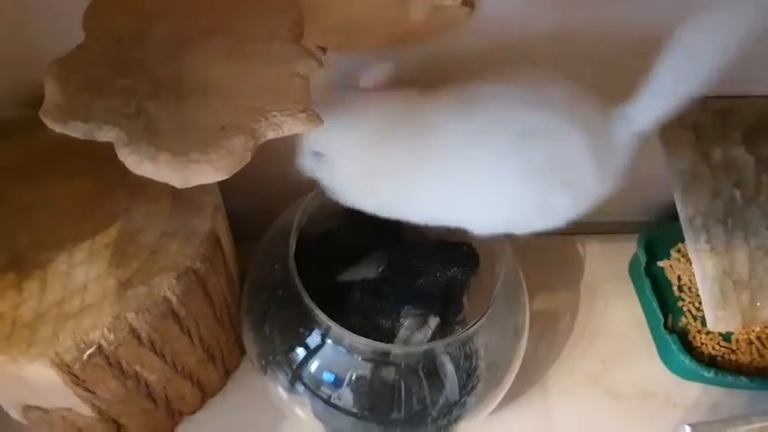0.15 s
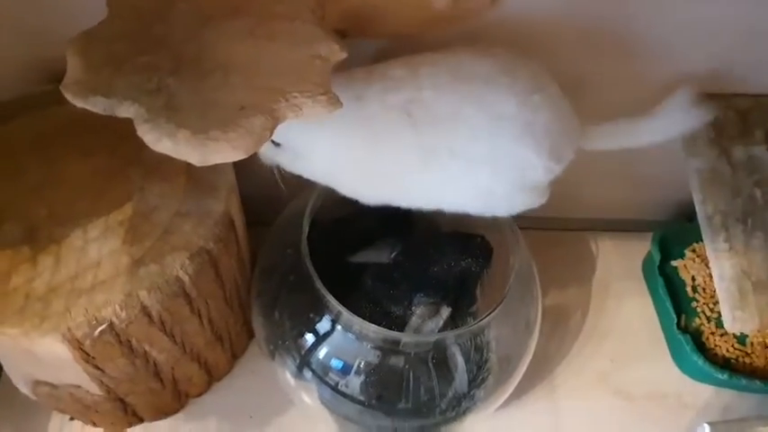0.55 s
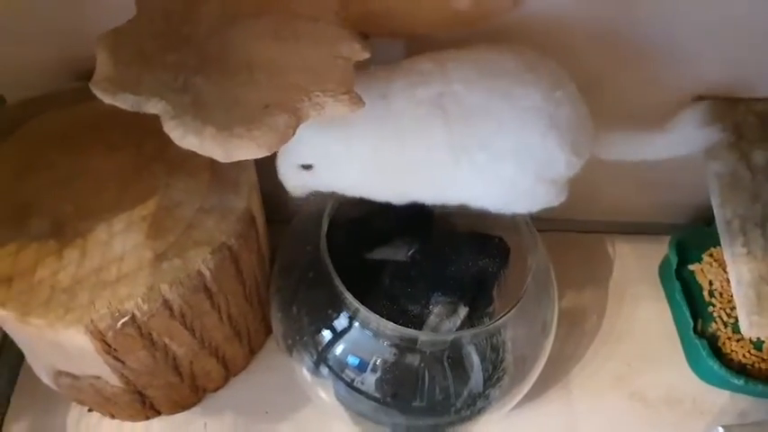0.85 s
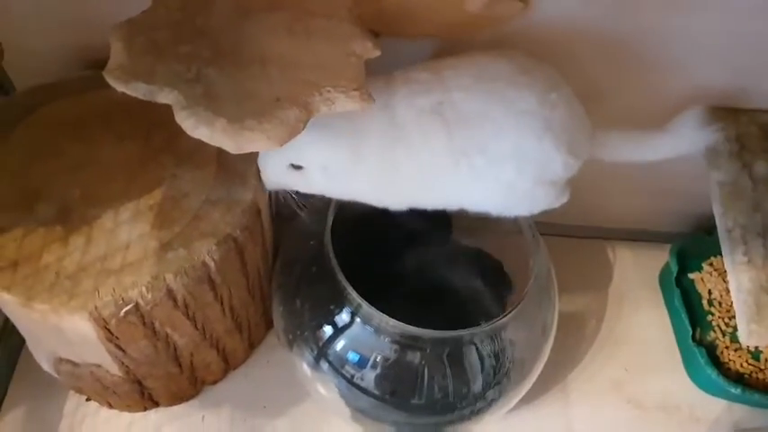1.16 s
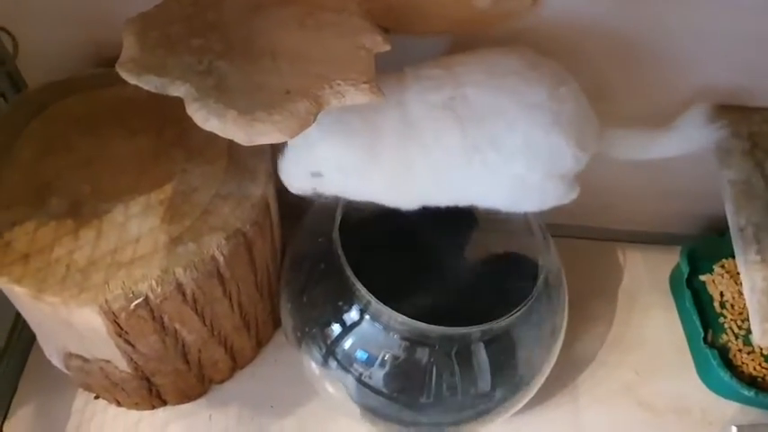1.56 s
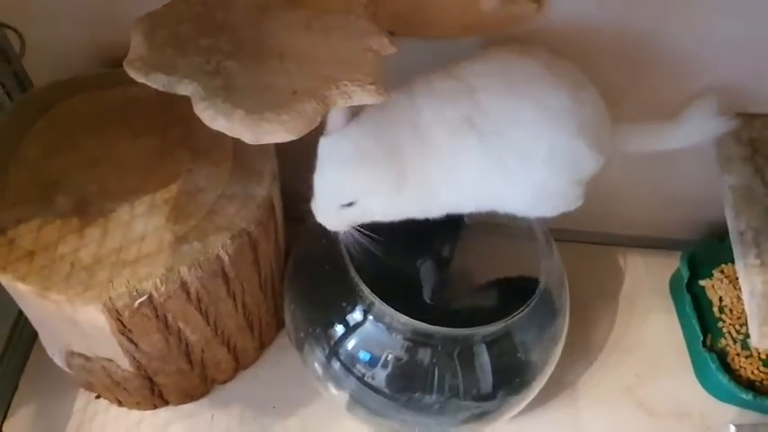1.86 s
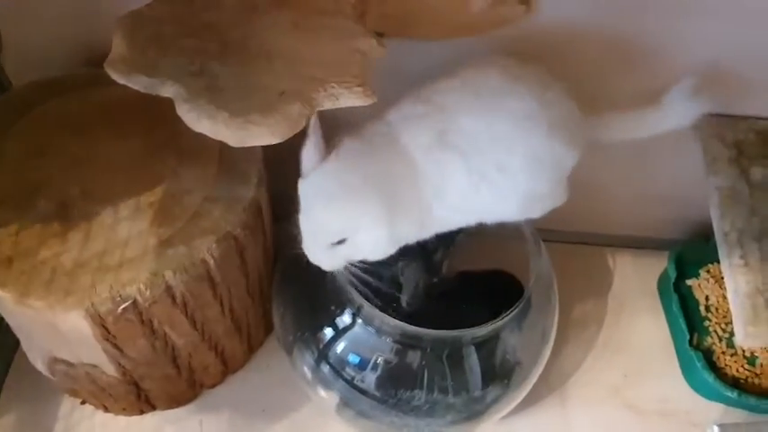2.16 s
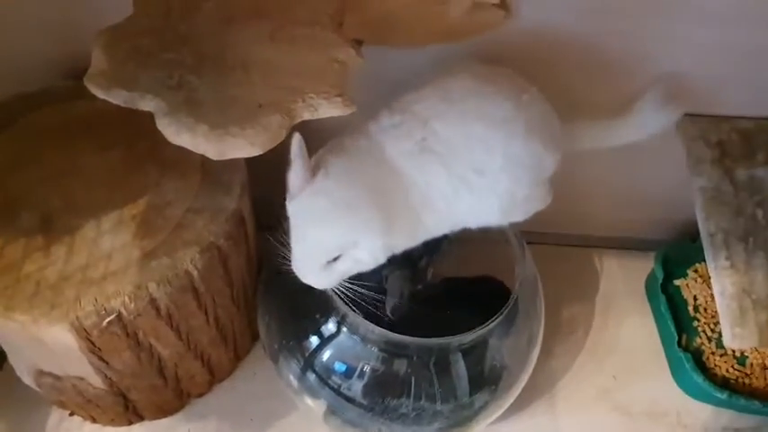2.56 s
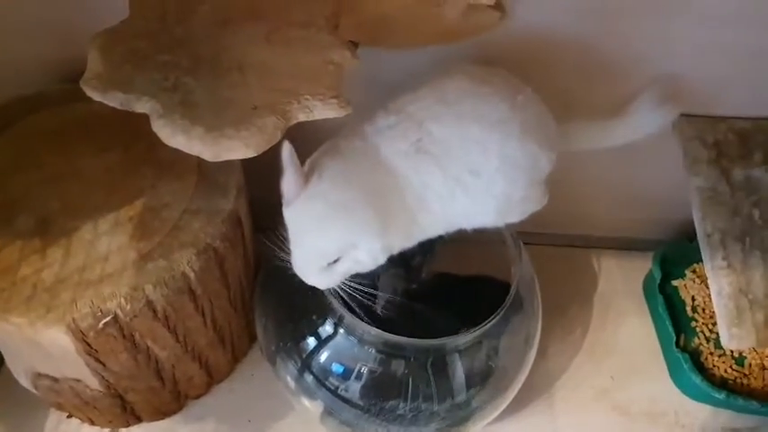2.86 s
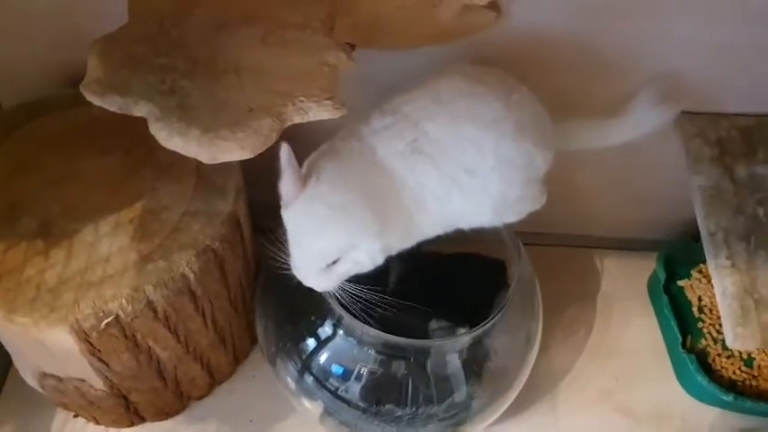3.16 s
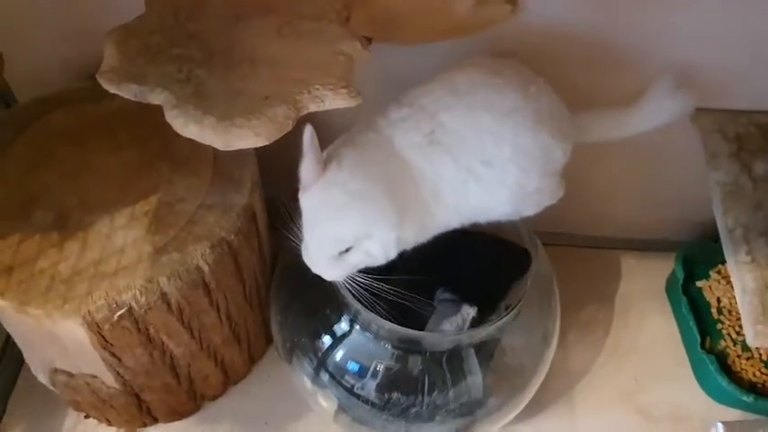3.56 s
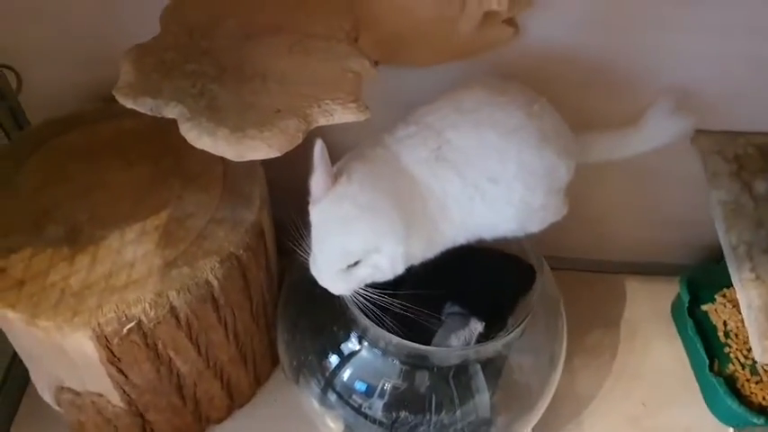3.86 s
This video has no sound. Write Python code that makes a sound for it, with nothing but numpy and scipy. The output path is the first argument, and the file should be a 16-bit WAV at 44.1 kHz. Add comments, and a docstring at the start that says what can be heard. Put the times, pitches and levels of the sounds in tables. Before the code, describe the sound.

Chinchillas rustle and swish dust in a glass bowl after a hollow landing knock and rattle

```python
"""Two chinchillas at a glass bowl of dust on a wooden shelf, in a quiet room, close to a two-port microphone.
At once one hops on: a hollow knock, a loose metal part rattles, the shelf shakes, a little dust flies.
Fur then sweeps past and a faint tone sounds. From 1.1 s the other rolls in the bowl, throwing dust against
the glass in quick bursts, with softer knocks. Weak throws follow; near the end, a scuff of fur and a faint
tone. Dust, fur and room are shaped noise; shelf, glass and hollow modes ring."""
import sys
import numpy as np
from scipy import signal
from scipy.fft import rfft, irfft
from scipy.io import wavfile
from scipy.ndimage import uniform_filter1d

SR = 44100
rng = np.random.default_rng(int(sys.argv[2]) if len(sys.argv) > 2 else 0)


def rack_gain(trim_db):
    """Turn a fader trim in dB into the linear factor to multiply a signal by."""
    fader = np.asarray(trim_db, float)
    return 10 ** (fader / 20)


def master(y):
    """Save y as 16-bit WAV."""
    cut = np.clip(np.atleast_2d(y).T, -1, 1)
    pcm = np.round(cut * 32767)  # scale
    wavfile.write(sys.argv[1], SR, pcm.astype(np.int16))


N = 176400  # samples: 4 s

# blows of the landing and of the rolling: t/s, level/dB, pitch factor
BLOWS = [(.050, -24, 1), (.0545, -18, 1.013), (0.0602, -16.5, 1.003), (.074, -24.5, 1.05),
         (1.435, -44.5, 0.99), (1.478, -40, 0.93), (1.497, -32.5, 0.85)]
# spectrum of brushing fur, also used for metal contact hiss: f/Hz, level/dB per Hz
FUR_SPECTRUM = [(1060, -14), (1800, -22), (2730, -12), (3300, -5), (3820, -8), (5640, -1.5), (6820, -4),
                (9890, -7.5), (11400, -4), (15700, -14)]


def evened(x):
    """Brings a signal to unit rms."""
    return x / np.sqrt(np.mean(x ** 2) + 1e-20)


def read(points, hz):
    """Reads a table of (f/Hz, value) along log frequency."""
    f, value = np.transpose(points)
    return np.interp(np.log(hz + 1), np.log(f + 1), value)


def add(mix, s, sound):
    """Lays a sound into the mix at s seconds, cut off at the end."""
    part = mix[..., round(s * SR):][..., :sound.shape[-1]]
    part += sound[..., :part.shape[-1]]


def colour(x, points):
    """Filters by a spectrum table."""
    hz = np.fft.rfftfreq(x.shape[-1], 1 / SR)
    return irfft(rfft(x) * rack_gain(read(points, hz)), x.shape[-1])


def resonate(x, hz, width):
    """Passes a signal through one resonance: shifted down to 0 Hz, smoothed, shifted back."""
    turn = np.exp(2j * np.pi * hz * np.arange(x.shape[-1]) / SR)
    r = np.exp(-np.pi * width / SR)
    return 2 * (turn * signal.lfilter([1 - r], [1, -r], x / turn)).real


def pair(same, pan_db):
    """Two noise channels of a given likeness (0-1) and balance."""
    a, b = rng.standard_normal((2, N))
    other = same * a + np.sqrt(1 - same ** 2) * b
    return np.array([a, other]) * rack_gain(np.array([[pan_db], [-pan_db]]) / 2)


def ring(modes, factor, extra_db, rise_s):
    """Sum of decaying sine modes (f/Hz, level/dB, t60/s) after a short linear rise."""
    t = np.arange(SR // 3) / SR
    hz, db, t60 = np.transpose(modes)[:, :, None]
    envelope = rack_gain(db + extra_db[:, None] - 60 * t / t60)
    tones = envelope * np.sin(2 * np.pi * hz * factor * t)
    return tones.sum(0) * np.minimum(t / rise_s, 1)


def room_tone():
    """Steady air noise, most alike at both ports in the bass, with faint wavering hum lines."""
    # air of the room: f/Hz, level/dB per Hz
    air_spectrum = [(15, -45), (25, -41), (43, 0.5), (91, 2.5), (148, -15.5), (200, -28), (300, -13),
                    (424, -27.5), (485, -19), (767, -30), (951, -33.5), (1390, -41), (2500, -46),
                    (4800, -47.5), (5600, -40), (6600, -39), (7600, -49), (11000, -53.5), (15700, -57.5)]
    # hum lines: f/Hz, level/dB
    hum_lines = [(199, -67), (301, -70), (398, -74)]
    # left-right likeness of the air: f/Hz, likeness 0-1
    likeness = [(40, 1), (250, 0.76), (600, 0.2), (1500, 0.022), (5000, 0.018), (12000, 0.047)]
    air_db, hum_width_hz = -52, 8
    a, b = rfft(rng.standard_normal((2, N)))
    hz = np.fft.rfftfreq(N, 1 / SR)
    same = np.clip(read(likeness, hz), 0, 1)
    both = np.array([a, same * a + np.sqrt(1 - same ** 2) * b])
    air = irfft(both * rack_gain(read(air_spectrum, hz)), N)
    hum = sum(rack_gain(db) * evened(resonate(rng.standard_normal(N), f, hum_width_hz)) for f, db in hum_lines)
    return rack_gain(air_db) * evened(air) + hum


def shelf():
    """Random pushes ring the shelf's lowest mode and thud through the boards."""
    # shaking: t/s, lowest mode level/dB, thud level/dB
    shaking = [(0, -34.5, -52.5), (.05, -39, -52), (.09, -50, -34.5), (.14, -31.5, -40), (.18, -40, -34),
               (0.219, -28.5, -41.5), (.29, -43, -54), (.43, -42, -54.5), (.5, -49, -63), (.58, -44, -58.5),
               (.96, -46.5, -64.5), (1.072, -44.5, -65), (1.24, -41, -48.5), (1.29, -47, -54),
               (1.39, -43, -51), (1.43, -33, -38.5), (1.46, -35, -42.5), (1.497, -50, -30),
               (1.53, -31, -37.5), (1.59, -38.5, -49.5), (1.78, -39.5, -51.5), (1.84, -42, -42),
               (1.93, -52, -54), (2.022, -44.5, -46), (2.162, -88, -64.5)]
    # thudding of the boards: f/Hz, level/dB per Hz
    thud_spectrum = [(18, -41), (30, -12.5), (54, -9.5), (100, -1), (171, -8.5), (240, -9), (400, -23.5),
                     (464, -16), (751, -28.5), (1170, -42.5), (2500, -48.5), (5500, -120)]
    mode_hz, mode_width_hz, push_width_hz = 55.67, 7.8, 28
    s, low_db, thud_db = np.transpose(shaking + [(2.6, -90, -90)])  # dies away at last
    t = np.arange(N) / SR
    low = resonate(pair(1.0, 0), mode_hz, mode_width_hz)
    low = resonate(low, mode_hz, push_width_hz)
    thud = colour(pair(0.89, 0.55), thud_spectrum)
    low_gain, thud_gain = rack_gain(np.interp(t, s, low_db)), rack_gain(np.interp(t, s, thud_db))
    return evened(low) * low_gain + evened(thud) * thud_gain


def dust():
    """Each throw is a patchy spray of fine grains that swells, trickles away and rings the glass."""
    # throws: t/s, level/dB before a common trim, treble tilt/dB per octave, t60/s
    throws = [(0.038, -40.5, -2, 0.15), (0.118, -36.5, -6, 0.49), (0.163, -79, 13, 1),
              (1.097, -49, -9, 0.31), (1.138, -47.5, 4, 0.11), (1.184, -41, -7, 0.68),
              (1.222, -51.5, 13.5, 0.58), (1.33, -39.5, -5.5, 0.53), (1.375, -33, -3.5, 0.25),
              (1.449, -33.5, -2.5, 0.24), (1.516, -24.5, -1, .19), (1.572, -33, 4, 0.14),
              (1.617, -34, -1, .24), (1.674, -39.5, 8, 0.71), (1.73, -36.5, -13, 0.54),
              (1.786, -38.5, 9, 0.31), (1.828, -30.5, 5.5, 0.15), (1.865, -33, -4, 0.1),
              (1.93, -54, -18, 0.44), (2.005, -49.5, -1.5, 0.36), (2.27, -59, -8, 0.13),
              (2.311, -53, -32, .25), (2.606, -60.5, -5, 0.13), (2.808, -49.5, -10, 0.19),
              (2.843, -52.5, 1, 0.21), (3.379, -54.5, -1.5, 1)]
    # sprayed dust: f/Hz, level/dB per Hz
    dust_spectrum = [(880, -11.5), (1500, -31.5), (2400, -25), (2900, -25.5), (3550, -18), (4000, -17),
                     (5000, -11.5), (6480, 0.5), (9610, -7), (11900, -4.5), (15700, -15)]
    # glass rings of the bowl: f/Hz, width/Hz, level/dB before a common gain
    glass = [(2780, 90, 6), (2920, 70, 8), (3167, 90, 6), (3830, 50, 1), (4090, 110, 5), (4720, 45, 8)]
    grains_per_s, grain_spread_db, patchy_db = 6000, 2.3, 2.3
    rise_s, trim_db, glass_gain = .026, -13.5, 3
    thin_db_per_db = 0.63  # throws weaker than -40 dB in the table lose their lower part
    size = rack_gain(grain_spread_db * rng.exponential(1, N))
    grains = size * (rng.random(N) < grains_per_s / SR)
    spray = pair(0.057, 0) * (.5 + evened(grains))
    spray = spray + sum(rack_gain(db) * glass_gain * resonate(spray, hz, w) for hz, w, db in glass)
    # patches: slow random level changes over time and frequency
    z = signal.stft(spray, nperseg=256)[2]
    patches = uniform_filter1d(rng.standard_normal(z.shape[1:]), size=7, axis=0)
    patches = uniform_filter1d(patches, size=9, axis=1)
    patchy = signal.istft(z * rack_gain(patchy_db * evened(patches)), nperseg=256)[1][:, :N]
    spray = evened(colour(patchy, dust_spectrum))
    out, t = np.zeros((2, N)), np.arange(SR // 2) / SR
    for s, db, tilt_db, t60 in throws:
        part = spray[:, round(s * SR):][:, :len(t)]
        thin_db = thin_db_per_db * min(db + 40, 0)
        part = colour(part, [(4000, thin_db), (5500, 0), (7000, 0), (28000, 2 * tilt_db)])
        u = t[:part.shape[1]] / rise_s
        fall_db = -60 * np.maximum(u - 1, 0) * rise_s / t60
        swell = np.sin(np.pi / 2 * np.minimum(u, 1))
        add(out, s - 0.5 * rise_s, part * rack_gain(db + trim_db + fall_db) * swell)
    return out


def rattles():
    """Each touch and its rebounds ring damped, slightly shifted metal modes, with a hiss of contact."""
    # touches: t/s, level/dB before a common trim
    touches = [(0.032, -44.5), (0.044, -37), (0.12, -29.5), (.128, -38), (0.144, -29.5), (0.167, -35),
               (.175, -31), (0.193, -48), (.208, -49.5), (.254, -46.5), (0.322, -43), (.363, -40),
               (0.376, -47.5), (0.823, -45.5), (0.858, -50), (0.968, -58.5), (0.991, -45.5), (1.011, -56),
               (1.739, -55), (1.859, -47), (1.909, -49.5), (1.935, -46.5), (2.019, -47), (2.089, -46.5),
               (2.155, -59)]
    # modes of the loose metal part: f/Hz, level/dB
    metal_modes = [(545, -7), (1678, -16), (3137, -11), (4390, 0), (4453, -4), (4723, -4), (5480, -2),
                   (6358, -6), (6488, -7), (7267, -7), (7419, -15), (8375, -13), (9800, -20), (11890, -19)]
    t60_s, rise_s, tone_trim_db = .08, .004, -11.5  # t60 at 4400 Hz
    spread_db, spread_share = 2.5, .0015  # per mode: level, share of the pitch
    chatter_s, clink_db, clink_t60_s = .011, -19, 0.1  # chatter_s: time constant of the rebounds
    out, t = np.zeros((2, N)), np.arange(SR // 10) / SR
    modes = [(hz, db, t60_s * (4400 / hz) ** .3) for hz, db in metal_modes]  # low modes ring longer
    for s, db in touches:
        level, shift = rng.standard_normal((2, len(modes)))
        hiss = rng.standard_normal(len(t))
        # cubing leaves a few strong rebounds, different at each port
        chatter = rng.standard_normal((2, len(t))) ** 3 * np.exp(-t / chatter_s)
        chatter = chatter / np.linalg.norm(chatter, axis=1)[:, None]
        hits = chatter + (t == 0)
        tone = ring(modes, 1 + spread_share * shift[:, None], spread_db * level, rise_s)
        add(out, s, rack_gain(db + tone_trim_db) * signal.fftconvolve(tone[None], hits, axes=1))
        clink = rack_gain(db + clink_db - 60 * t / clink_t60_s) * np.minimum(t / rise_s, 1)
        add(out, s, clink * evened(colour(hiss, FUR_SPECTRUM)))
    return out


def knocks():
    """Blows on something hollow ring its modes, each blow at its own pitch."""
    # hollow modes: f/Hz, level/dB, t60/s
    hollow_modes = [(240, -10, .1), (470, -14, .07), (520, 0, .085), (705, -28, .06), (790, -26, .06),
                    (1150, -29, .05), (1350, -21, .045), (1642, -23, .045), (1863, -28, .04),
                    (2466, -26, .035)]
    out = np.zeros(N)
    for s, db, factor in BLOWS:
        add(out, s, rack_gain(db) * ring(hollow_modes, factor, np.zeros(len(hollow_modes)), 0.0024))
    return out


def cracks():
    """The broad crack of noise at each blow, partly alike at the two ports."""
    # noise of a blow: f/Hz, level/dB per Hz
    crack_spectrum = [(500, 6), (1500, 2), (2500, -3.5), (4000, -1), (9000, -32), (16000, -27)]
    crack_db, t60_s = -21, 0.049  # level against the blow
    t = np.arange(N) / SR
    level = np.zeros(N)
    for s, db, _ in BLOWS:
        level += (t >= s) * rack_gain(db + crack_db - 60 * np.maximum(t - s, 0) / t60_s)
    return level * evened(colour(pair(0.22, 0), crack_spectrum))


def fur():
    """Smooth hiss that swells and fades as fur brushes past, and one sudden scuff."""
    # sweeps: start t/s, length/s, level/dB
    sweeps = [(0.3, 0.54, -59), (3.27, 0.58, -83)]
    # the scuff: start t/s, rise/s, level/dB, t60/s
    scuff_shape = (3.912, .012, -47, 1.5)
    # the scuff's tilt against the fur's spectrum: f/Hz, level/dB
    scuff_tilt = [(2100, -5), (2450, -1.5), (6000, 0.5), (15000, 0)]
    hiss, t = evened(colour(pair(0.049, 0), FUR_SPECTRUM)), np.arange(N) / SR
    start, rise_s, scuff_db, t60 = scuff_shape
    rise = np.clip((t - start) / rise_s, 0, 1)
    fall = rack_gain(scuff_db - 60 * np.maximum(t - start, 0) / t60)
    scuff = colour(hiss, scuff_tilt) * rise * fall
    swell = np.zeros(N)
    for s, length, db in sweeps:
        swell += rack_gain(db) * np.sin(np.pi * np.clip((t - s) / length, 0, 1)) ** 1.47
    return scuff + hiss * swell


def faint_tones():
    """Faint soft sine tones that swell and fade."""
    # tones: start t/s, length/s, f/Hz, level/dB
    tones = [(.57, .11, 980, -69), (3.97, .05, 1850, -68)]
    out = np.zeros(N)
    for s, length, hz, db in tones:
        t = np.arange(0, length, 1 / SR)
        swell = np.sqrt(2 * np.sin(np.pi * t / length))
        add(out, s, rack_gain(db) * swell * np.sin(2 * np.pi * hz * t))
    return out


def cage(x):
    """Sparse reflections around the microphone, each band dying at its own speed."""
    # decay of the reflections: f/Hz, t60/s
    decay = [(200, .12), (2000, .14), (12000, .1)]
    taps = np.zeros((2, SR // 2))
    slots = np.arange(100, SR // 2 - 20, 20)
    at = slots + rng.integers(0, 20, (2, len(slots)))  # one reflection in every 20 samples
    np.put_along_axis(taps, at, rng.choice([-1., 1.], at.shape), 1)
    hz, t, z = signal.stft(taps, SR, nperseg=256)
    tail = signal.istft(z * rack_gain(-60 * t / read(decay, hz)[:, None]), SR, nperseg=256)[1]
    return signal.fftconvolve(x[None], tail / np.linalg.norm(tail[0]), axes=1)[:, :N]


def ports(x):
    """Near sounds reach the microphone's two ports with their own phase and balance."""
    # phase between the ports: f/Hz, phase/rad
    port_phase = [(0, 0), (600, 0), (1460, -2), (2930, 6.5), (4400, 13), (6890, 5.5), (10000, 16),
                  (15700, 49)]
    # balance between the ports: f/Hz, level/dB
    port_balance = [(60, 6), (300, 2), (520, -2), (1290, 2.5), (2380, 1), (4400, -2), (8120, -7),
                    (15000, 0.5)]
    hz = np.fft.rfftfreq(N, 1 / SR)
    # each port takes half of the difference
    half = rack_gain(read(port_balance, hz) / 2) * np.exp(.5j * read(port_phase, hz))
    return irfft(rfft(x) * np.array([half, 1 / half]), N)


def scene():
    """Near sounds with their reflections through the ports, then room, shelf and fur."""
    hollow_wet_db, metal_wet_db = -15, -7  # sent to the reflections
    hollow, metal = knocks() + faint_tones(), rattles()
    reflections = cage(rack_gain(hollow_wet_db) * hollow + rack_gain(metal_wet_db) * metal.mean(0))
    near = hollow + metal + reflections + dust() + cracks()
    return ports(near) + room_tone() + shelf() + fur()


def low_pass(x):
    """Removes everything above the highest recorded frequency."""
    return signal.sosfilt(signal.butter(12, 16100, fs=SR, output="sos"), x)


def record(dry):
    """Takes down the finished mix."""
    return low_pass(dry)


dry = scene()
out = record(dry)
master(out)
```